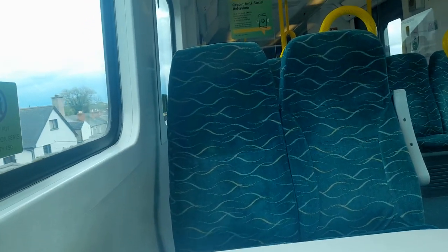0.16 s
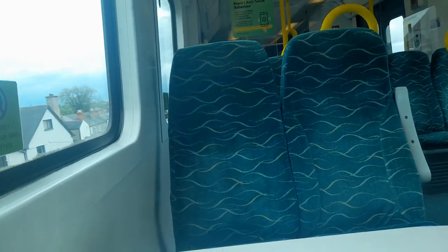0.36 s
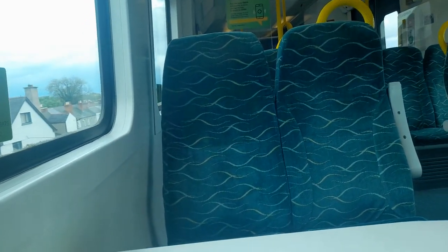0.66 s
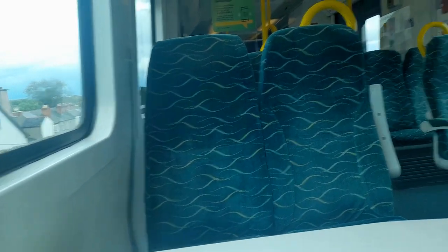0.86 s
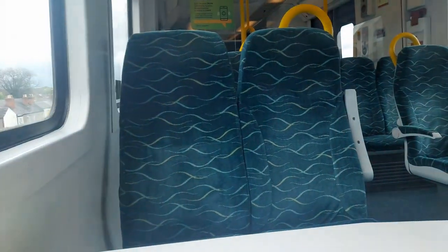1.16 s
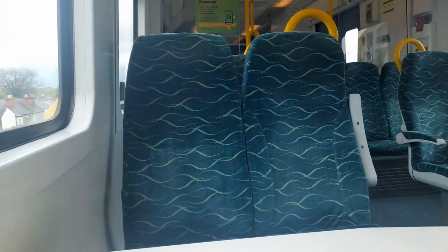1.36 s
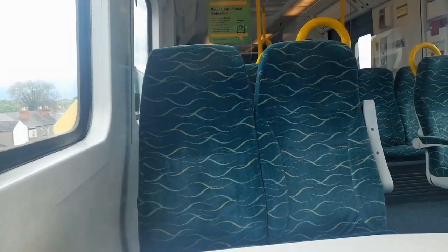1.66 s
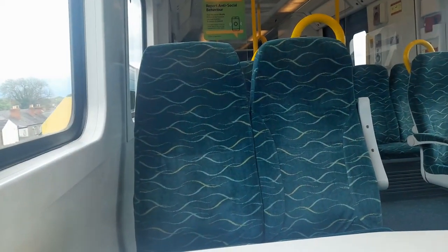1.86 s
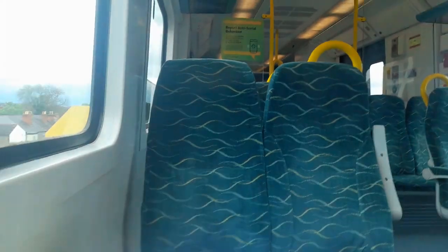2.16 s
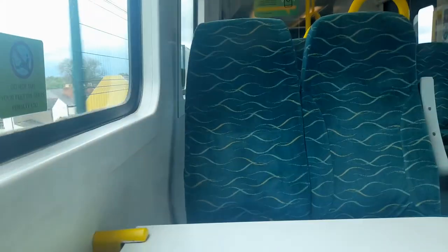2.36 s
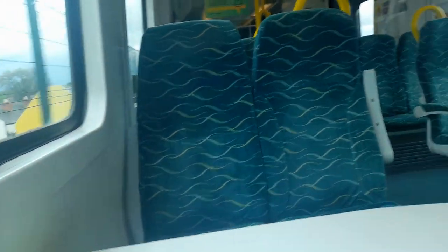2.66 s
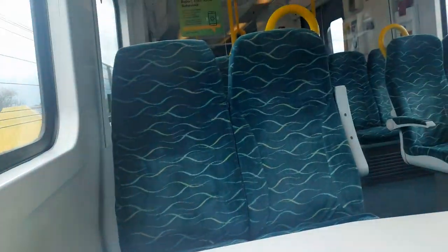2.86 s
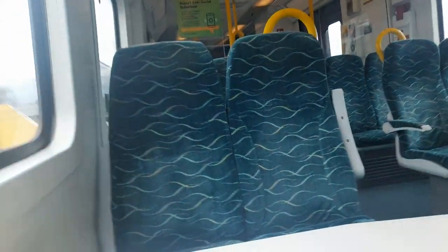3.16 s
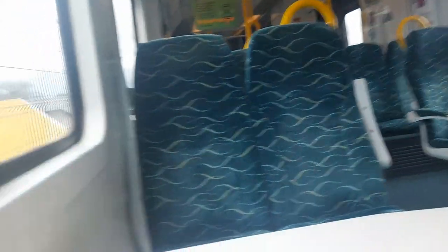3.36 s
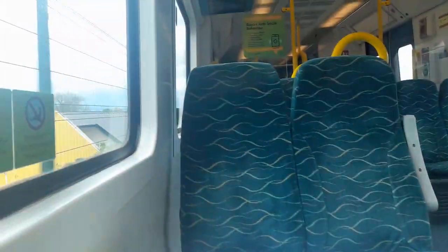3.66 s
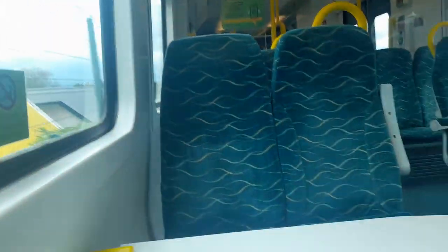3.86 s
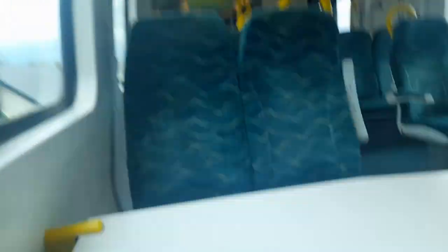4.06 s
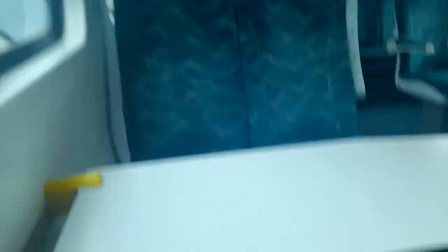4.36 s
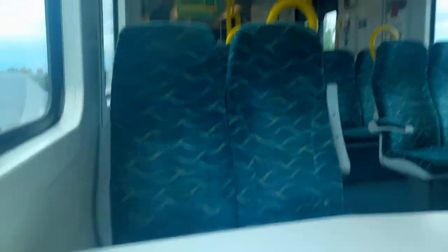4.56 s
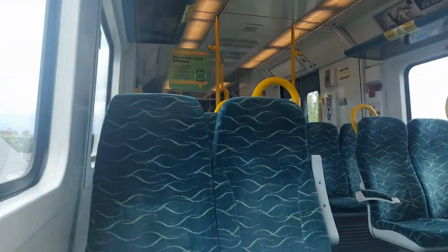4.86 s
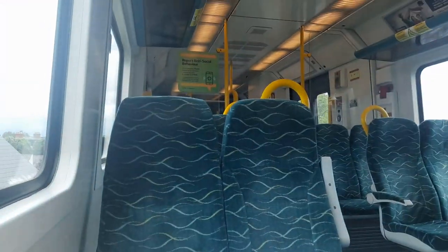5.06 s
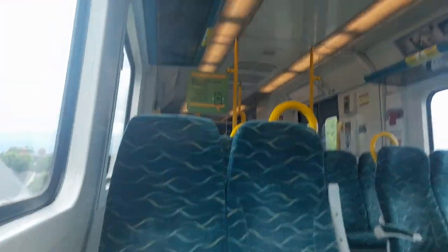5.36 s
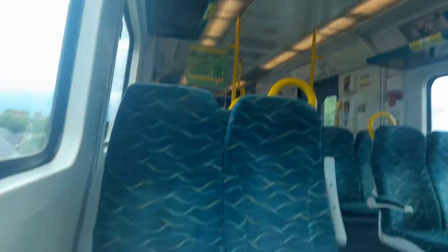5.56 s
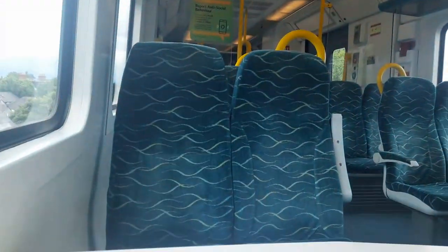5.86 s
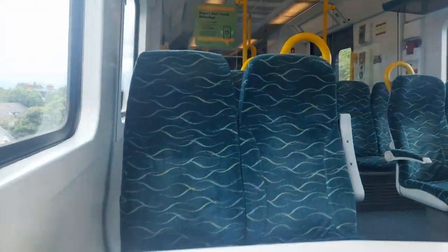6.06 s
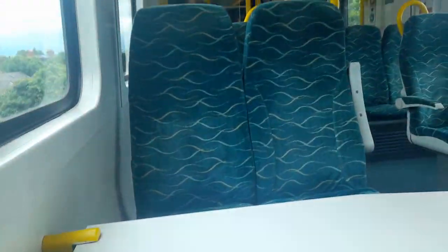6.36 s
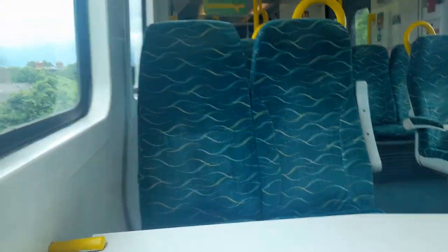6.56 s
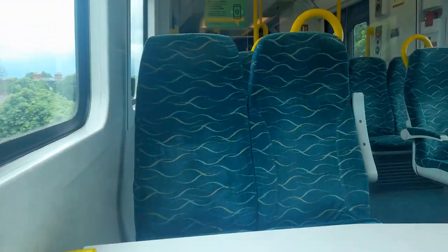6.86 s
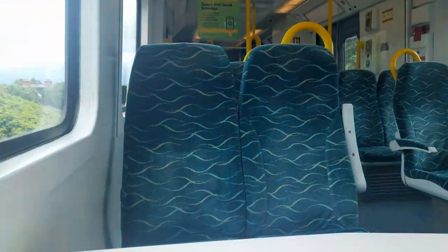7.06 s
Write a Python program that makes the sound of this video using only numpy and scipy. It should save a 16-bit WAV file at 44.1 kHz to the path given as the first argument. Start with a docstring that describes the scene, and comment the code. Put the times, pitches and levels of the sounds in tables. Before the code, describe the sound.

A handheld stereo microphone in an enclosed train carriage picks up a heavy, bass-rich diesel drone, nearly constant for five seconds, with a faint sinking hum and slowly rising gear whine inside it. Tiny dry clicks and soft rubs mark the hand holding the device. Then power is cut, the engine note drops steadily, its roar thins, and duller, wavering wheel rumble and airy ventilation hiss become clearer.

```python
"""Diesel engine under a railcar floor: six cylinders drone at full power, throttle closes at 5 s, speed runs down.
Crank-locked sine orders, the strongest weighted by cabin resonances, plus pump lines and a noise roar.
A sinking hum and rising gear whine fade off load; shaped noise makes the wheel rumble.
A hand ticks and brushes near the microphone in noise bursts.
Ventilation is a noise hiss with thin sine whines."""
import sys
import numpy as np
from scipy import signal
from scipy.fft import rfft, irfft, next_fast_len
from scipy.io import wavfile

SR = 44100
rng = np.random.default_rng(int(sys.argv[2]) if len(sys.argv) > 2 else 0)


def inscribe(sig):
    """Save sig as 16-bit PCM at rate SR to the path in sys.argv[1].

    A 1-D sig is mono; a 2-D sig holds one channel per row.
    Samples are clipped to [-1, 1] before scaling.
    """
    pcm = np.round(np.clip(np.atleast_2d(sig).T, -1, 1) * 32767)
    wavfile.write(sys.argv[1], SR, pcm.astype(np.int16))


N = 318402
TIME = np.arange(N) / SR

FULL_RPM, SINK_TO_RPM = 1701.1, 300
THROTTLE_OFF_S = 5.0
SPEED_TAU_S, FUEL_TAU_S, ROAR_TAU_S, DRIVE_TAU_S = 2.32, 0.21, 1.25, 0.49
ROAR_DROP_DB = 10
PUMP_FADE_DB_PER_S = 1.34

# Strong orders, 6 = firing rate: [order/cycles, pulling level/dB, coasting level/dB], before cabin gain
STRONG_ORDERS = [(6, -6.5, -13), (9, -16, -20), (12, -16, -13), (15, -15.5, -25), (18, -16, -22.5)]
# Weak orders from unequal cylinders: [order/cycles, level at full load/dB]
WEAK_ORDERS = [(4, -37.5), (5, -30), (7, -44.5), (10, -29), (11, -36), (13, -38), (14, -45.5), (16, -39),
               (17, -38), (19, -41), (20, -39.5), (21, -46), (22, -47.5), (24, -48), (27, -47.5), (30, -54),
               (31, -54.5), (32, -46), (44, -57.5), (45, -57.5), (49, -59), (51, -62)]
# Belt-driven pumps, out of step with the cylinders: [f at full speed/Hz, level at start/dB]
PUMP_LINES = [(408.5, -52), (539.8, -45), (623.6, -61), (637.6, -62)]
# Combustion roar at full load: [f/Hz, density/dB per Hz]
ROAR_SPECTRUM = [(28, -73), (52, -50.5), (100, -61), (190, -61), (245, -57.5), (305, -60.5), (360, -67),
                 (450, -65.5), (560, -70), (720, -72.5), (860, -79.5), (1300, -87), (2000, -90),
                 (7000, -130)]


def engine(wobble_cycles=0.0026, crank_start_cycles=0.0503, line_fade_ratio=1.7, floor_cut_hz=50,
           pulling_flutter_db=0.83, coasting_flutter_db=2.0):
    """Crank-locked orders, pumps and combustion roar; the floor radiates little deep bass of the weak orders."""
    rpm = SINK_TO_RPM + (FULL_RPM - SINK_TO_RPM) * run_down(SPEED_TAU_S)
    fuel = run_down(FUEL_TAU_S)
    load_db = ROAR_DROP_DB * (run_down(ROAR_TAU_S) - 1)
    cycle_hz = rpm / 120  # four-stroke: two turns per cycle
    hunting = wobble_cycles * drift(3.8)  # governor
    cycles = crank_start_cycles + np.cumsum(cycle_hz) / SR + hunting
    strong_flutter_db = fuel * pulling_flutter_db + (1 - fuel) * coasting_flutter_db

    # common phase origin, orders in threes: the sum throbs three times a cycle
    boom = 0
    for order, pulling_db, coasting_db in STRONG_ORDERS:
        source_gain = from_db(fuel * pulling_db + (1 - fuel) * coasting_db)
        gain = source_gain * cabin_gain(order * cycle_hz)
        boom = boom - gain * tone(order * cycles, order * cycle_hz[0], strong_flutter_db, flutter_rate_hz=6.4)

    lines = 0
    for order, level_db in WEAK_ORDERS:
        # uneven firing: low orders a quarter turn off; cabin modes scatter the rest
        lag_turns = .25 if order < 12 else rng.random()
        radiated = 1 / np.sqrt(1 + (floor_cut_hz / (order * cycle_hz)) ** 8)
        line = tone(order * cycles + lag_turns, order * cycle_hz[0], flutter_db=1.5, flutter_rate_hz=4.0)
        lines = lines + radiated * from_db(level_db) * line

    for hz, level_db in PUMP_LINES:
        turns = hz / cycle_hz[0] * cycles + rng.random()
        gain = from_db(level_db - PUMP_FADE_DB_PER_S * TIME)
        lines = lines + gain * tone(turns, hz, flutter_db=1.5, flutter_rate_hz=2.0)

    # off load the lines fade faster than the roar
    return boom + from_db(line_fade_ratio * load_db) * lines + from_db(load_db) * cabin_noise(ROAR_SPECTRUM)


def run_down(tau_s):
    """1 until the throttle closes, then exponential decay."""
    return np.exp(-np.maximum(TIME - THROTTLE_OFF_S, 0) / tau_s)


# Air resonances of the carriage: [f/Hz, width/Hz, level/dB]
CABIN_RESONANCES = [(68.4, 8.3, -23), (85.6, 12, -14.5), (111, 4.6, -20), (123.4, 8.06, .5),
                    (130.9, 8, -12), (139.5, 7, -8), (162.7, 6, -5.5), (186, 10, -22), (216.3, 35, -20.5),
                    (259.8, 23, -29), (312.7, 10, -16), (332.1, 14, -21.5)]


def cabin_gain(hz):
    """Summed resonance peaks: gain of the carriage for a line at this pitch."""
    grid_hz = np.arange(0, 400, .25)
    answer = 0
    for centre_hz, width_hz, level_db in CABIN_RESONANCES:
        answer = answer + from_db(level_db) / (1 + (2 * (grid_hz - centre_hz) / width_hz) ** 2)
    return np.interp(hz, grid_hz, answer)


HUM_START_HZ, HUM_SAG_HZ_PER_S, HUM_DB = 341, 8.4, -18  # level before cabin gain
GEAR_START_HZ, GEAR_RISE_HZ_PER_S, GEAR_DB = 472, 14, -55


def drive(waver_hz=1.2):
    """Sinking hum swelling at cabin resonances; gear whine climbing as the train gathers speed."""
    hum_hz = HUM_START_HZ - HUM_SAG_HZ_PER_S * TIME
    gear_hz = GEAR_START_HZ + GEAR_RISE_HZ_PER_S * TIME
    hum_turns = np.cumsum(hum_hz + waver_hz * drift(5)) / SR
    hum = tone(hum_turns, HUM_START_HZ, flutter_db=1.0, flutter_rate_hz=18)
    gears = tone(np.cumsum(gear_hz) / SR, GEAR_START_HZ, flutter_db=2.5, flutter_rate_hz=3.6)
    both = from_db(HUM_DB) * cabin_gain(hum_hz) * hum + from_db(GEAR_DB) * gears
    return run_down(DRIVE_TAU_S) * both


# Rolling rumble before its level curve: [f/Hz, density/dB per Hz]
RUMBLE_SPECTRUM = [(18, -81.5), (35, -66.5), (55, -53.5), (78, -41), (100, -52.5), (125, -43), (155, -49.5),
                   (190, -59), (290, -57), (370, -68), (560, -72.5), (850, -86.5), (1500, -101),
                   (5000, -140)]
# Rumble gain over time: [t/s, level/dB]
RUMBLE_CURVE = [(0, -6.5), (1, -12.5), (4.9, -11), (5.4, 2.5), (6.1, -4), (6.8, -0.5), (7.22, -2)]


def wheels(waver_db=1.2):
    """Rolling noise through the floor, wavering slowly, fuller once the throttle has closed."""
    level_db = np.interp(TIME, *np.transpose(RUMBLE_CURVE))
    return from_db(level_db + waver_db * drift(4.5)) * cabin_noise(RUMBLE_SPECTRUM)


TICK_T60_S = .0085
# Fingers ticking on the case: [t/s, onset level/dB per Hz before shape, left minus right/dB]
FINGER_TICKS = [(1.767, -89.5, 15), (2.162, -87.5, -10.5), (3.402, -90, 10), (3.565, -87, 8),
                (3.575, -79.5, 12), (3.771, -85, 6), (3.839, -90, -3), (4.009, -76.5, -13),
                (4.133, -86, -2), (6.029, -92, 4), (6.13, -83.5, 12)]
# Spectral shape of a tick: [f/Hz, level/dB]
TICK_SHAPE = [(800, -40), (4600, -16), (6700, -1), (8500, -11), (12000, -6), (16000, -10)]
# Skin and cloth: [t of peak/s, level/dB per Hz before shape, half length/s, swish re rub/dB]
BRUSH_STROKES = [(0.537, -96, 0.012, -12.5), (1.144, -95, 0.042, -14), (2.21, -95, 0.029, -20),
                 (2.83, -94.5, .033, -10.5), (3.054, -105, 0.098, -7), (3.832, -98, .016, -8),
                 (4.06, -101, .014, -3), (4.1, -98, .008, -6.5), (4.347, -92.5, .014, -12),
                 (4.952, -87.5, .029, -16), (6.692, -92.5, 0.0058, -13), (6.713, -96.5, .08, -7),
                 (6.849, -93, .014, -18), (6.92, -102, .043, -6), (7.21, -95.5, 0.042, -9)]
# Spectral shape of the duller rub: [f/Hz, level/dB]
RUB_SHAPE = [(1400, -24.5), (3000, -5), (5000, -2), (6700, -.5), (8200, -27), (16000, -22)]
# Spectral shape of the bright swish: [f/Hz, level/dB]
SWISH_SHAPE = [(3000, -28), (8000, -7), (11000, -1.5), (14000, -3.5), (16000, -8)]


def hand(grain_db=2.8, linger=1.2):
    """Fast-decaying noise ticks and soft grainy brushes."""
    ticks, rub, swish = np.zeros((2, N)), np.zeros(N), np.zeros(N)
    for start_s, level_db, side_db in FINGER_TICKS:
        after = (TIME >= start_s) & (TIME < start_s + 2 * TICK_T60_S)
        decay_db = -60 * (TIME[after] - start_s) / TICK_T60_S
        ticks[:, after] += from_db(level_db + decay_db) * pan(side_db)
    for peak_s, level_db, half_length_s, swish_db in BRUSH_STROKES:
        near = np.abs(TIME - peak_s) < 10 * half_length_s
        since_s = TIME[near] - peak_s
        side_length_s = half_length_s * np.where(since_s > 0, linger, 1)  # slower fade than rise
        stroke = from_db(level_db) * np.exp(-(np.abs(since_s) / side_length_s) ** 1.3)
        rub[near] += stroke
        swish[near] += stroke * from_db(swish_db)
    brushes = rub * cabin_noise(RUB_SHAPE) + swish * cabin_noise(SWISH_SHAPE)
    return ticks * cabin_noise(TICK_SHAPE) + brushes * from_db(grain_db * drift(90))


HISS_DB = -1.5
# Air hiss before HISS_DB: [f/Hz, density/dB per Hz]
HISS_SPECTRUM = [(280, -88.5), (650, -72), (860, -79.5), (1020, -74.5), (1300, -82), (2000, -86),
                 (2600, -89), (3300, -94.5), (6200, -97), (7100, -101), (8100, -115), (12000, -113.5),
                 (16000, -117)]
# Steady whines of fans and auxiliaries: [f/Hz, level/dB]
FAN_WHINES = [(561.5, -50), (1019.8, -57.5), (1086, -66), (1531.1, -70), (2008.8, -72), (3953.4, -83)]


def ventilation(waver=.0007):
    """Broadband air hiss with thin motor whines, slightly wavering in pitch."""
    out = from_db(HISS_DB + 0.49 * drift(16)) * cabin_noise(HISS_SPECTRUM)
    for hz, level_db in FAN_WHINES:
        turns = hz * np.cumsum(1 + waver * drift(2.8)) / SR
        out = out + from_db(level_db) * tone(turns, hz, flutter_db=0.5, flutter_rate_hz=4.8)
    return out


# Width of the sound field: [f/Hz, side minus mid/dB]
FIELD_WIDTH = [(70, -16), (130, -22), (200, -14), (300, -6.5), (640, -4.5), (1000, 2), (1400, 2), (2400, 0),
               (16000, 0)]
# Stereo balance: [f/Hz, left minus right/dB]
FIELD_TILT = [(60, -1.6), (125, -.9), (200, 0), (380, .5), (700, -.8), (2400, -1), (4400, -2.2),
              (8000, -1.5), (15000, 1)]


def cabin_noise(spectrum):
    """Diffuse stereo noise of a given density: alike on both sides in the bass, unrelated in the treble."""
    size = next_fast_len(N)
    hz = np.arange(size // 2 + 1) * SR / size
    mid, side = rfft(rng.standard_normal((2, size)))
    both = mid + from_db(at_hz(FIELD_WIDTH, hz)) * side * np.array([[1], [-1]])
    shaped = both * from_db(at_hz(spectrum, hz)) * pan(at_hz(FIELD_TILT, hz))
    return irfft(shaped, size)[:, :N] * np.sqrt(SR / 2)  # white density to 1 per Hz


def tone(turns, hz, flutter_db, flutter_rate_hz):
    """Fluttering sine, mid rms about 1; standing waves put the sides out of step by the width at hz."""
    angle = (2 * np.pi * (turns - np.floor(turns))).astype(np.float32)
    level = from_db(flutter_db * drift(flutter_rate_hz)).astype(np.float32)
    mid = np.sin(angle)
    side = np.float32(from_db(at_hz(FIELD_WIDTH, hz))) * np.cos(angle)
    balance = (np.sqrt(2) * pan(at_hz(FIELD_TILT, hz))).astype(np.float32)
    return np.array([mid - side, mid + side]) * level * balance


def drift(rate_hz):
    """Slow random wander, spread 1: white noise through two equal poles at rate_hz."""
    step = 100  # samples per drawn point
    r = np.exp(-2 * np.pi * rate_hz * step / SR)
    noise = rng.standard_normal(N // step + 2002)
    slow = signal.lfilter([1], [1, -2 * r, r * r], noise)[2000:]  # drop settling
    return np.interp(TIME, np.arange(len(slow)) * step / SR, slow / slow.std())


def from_db(db):
    """Decibels to amplitude gain."""
    return np.exp(np.asarray(db) * np.log(10) / 20)


def at_hz(points, hz):
    """Spectrum interpolated on a log-frequency axis."""
    f, value = np.transpose(points)
    return np.interp(np.log(np.maximum(hz, 1)), np.log(f), value)


def pan(db):
    """Left and right gains for a level difference."""
    return from_db(np.array([[.5], [-.5]]) * db)


def scene():
    """All sources summed, as heard from a window seat."""
    return engine() + drive() + wheels() + hand() + ventilation()


def record(dry):
    """5 ms ease-in; microphone loses the deepest bass; steep cut of the top."""
    eased = dry * np.sin(np.pi / 2 * np.minimum(TIME / .005, 1)) ** 2
    bass_cut = signal.butter(2, 20, "high", fs=SR, output="sos")
    top_cut = signal.ellip(10, .1, 80, 16100, fs=SR, output="sos")
    return signal.sosfilt(top_cut, signal.sosfilt(bass_cut, eased))


dry = scene()
out = record(dry)
inscribe(out)
```